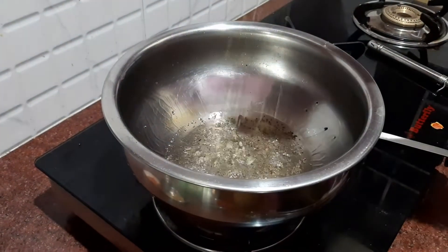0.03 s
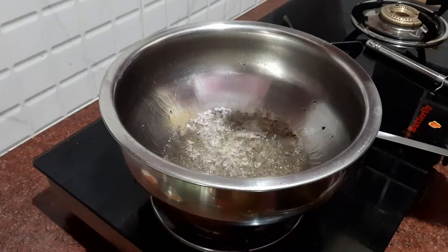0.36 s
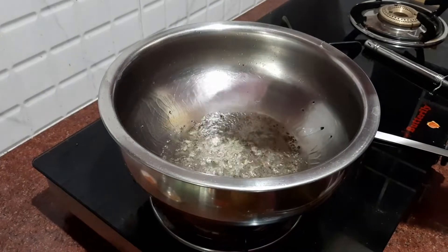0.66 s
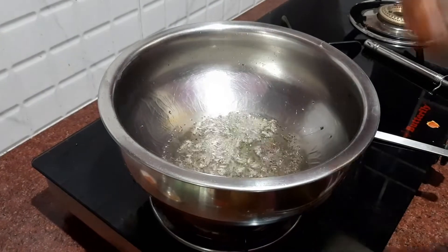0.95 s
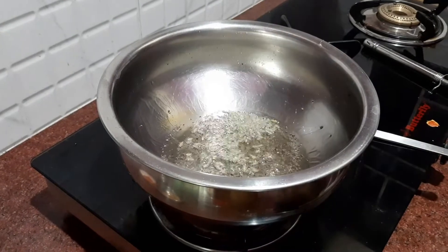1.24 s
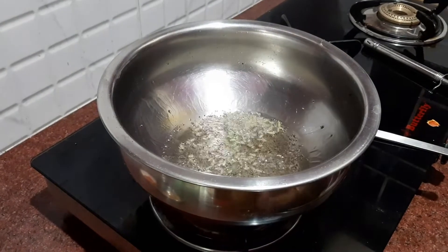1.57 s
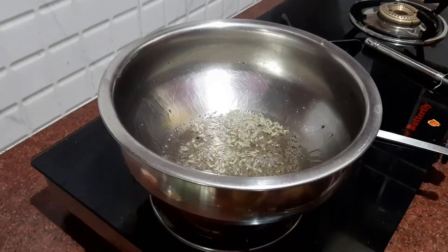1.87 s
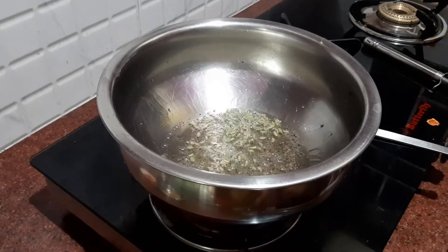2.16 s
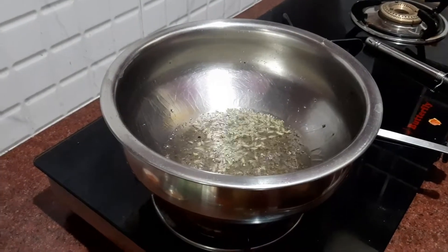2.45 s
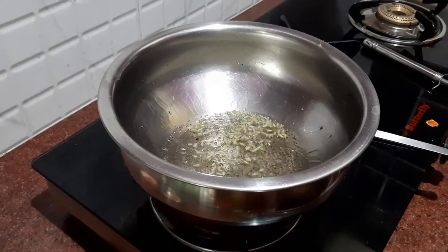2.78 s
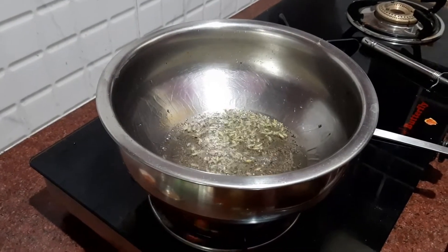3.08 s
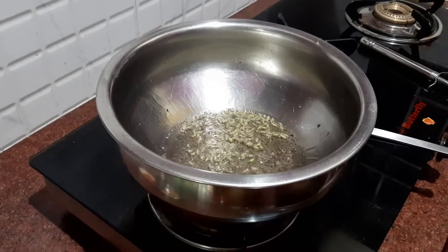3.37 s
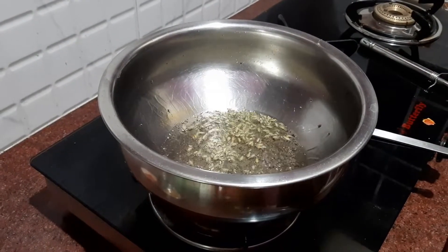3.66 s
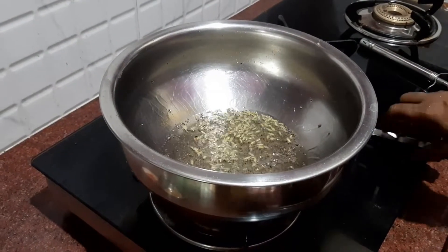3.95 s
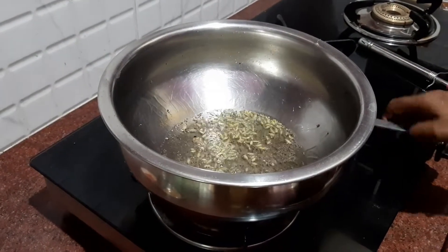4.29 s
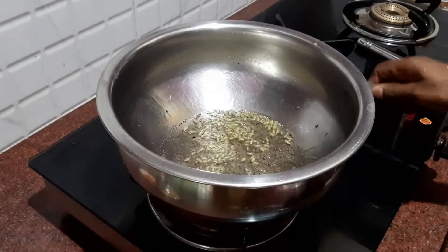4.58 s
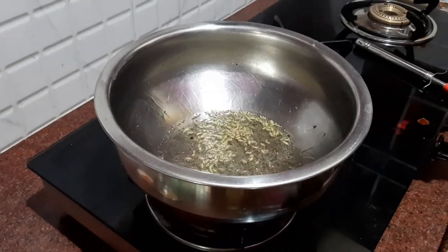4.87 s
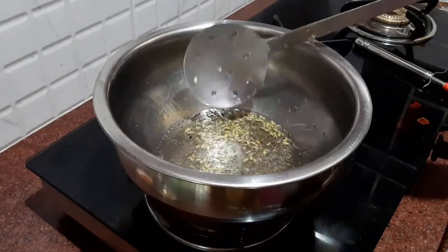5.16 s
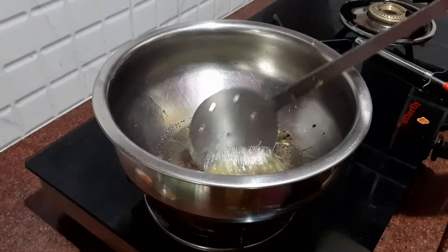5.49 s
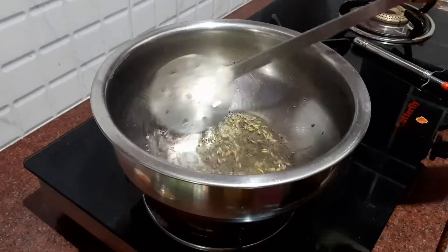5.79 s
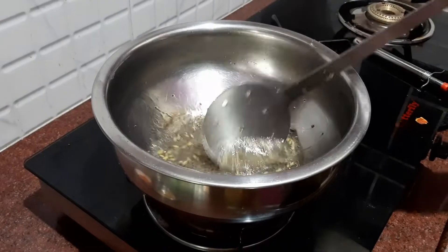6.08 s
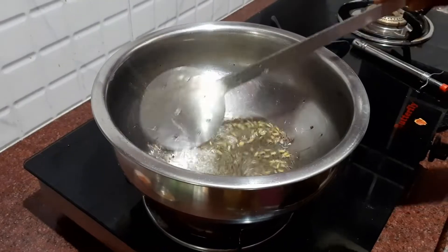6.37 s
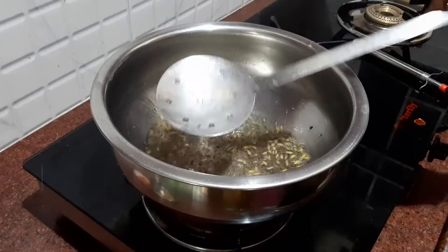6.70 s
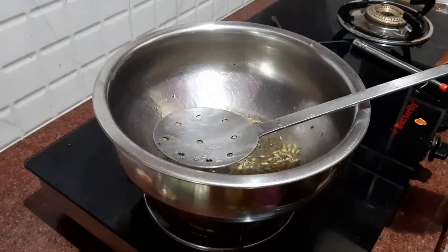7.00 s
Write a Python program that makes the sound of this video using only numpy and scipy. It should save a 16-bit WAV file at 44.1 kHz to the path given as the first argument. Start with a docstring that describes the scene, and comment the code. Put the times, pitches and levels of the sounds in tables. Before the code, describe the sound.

Hot oil crackles around frying seeds in a steel pot until a metal ladle clanks in and stirs with ringing scrapes.

```python
"""Seeds fry in hot oil in a steel pot, over the soft roar of a gas burner in a small tiled kitchen.
From the start, steam leaves them in short squeaks and oil spatters after each; oil films burst in
sharp spits. It all scatters round bowl and room, over a sizzle that thins as the seeds dry.
About five seconds in, a steel ladle knocks the pot, then scrapes and stirs, and the sizzle swells."""
import sys
import numpy as np
from scipy import signal
from scipy.fft import rfft, irfft
from scipy.io import wavfile

SR = 44100
rng = np.random.default_rng(int(sys.argv[2]) if len(sys.argv) > 2 else 0)


def store_wav(level_fs):
    """Save 16-bit WAV to argv[1]."""
    pcm = np.round(np.clip(np.atleast_2d(level_fs), -1, 1) * 32767)
    wavfile.write(sys.argv[1], SR, pcm.T.astype(np.int16))


N = 314874
T = np.arange(N) / SR
HIT_GAIN = np.sqrt(SR / 100)  # brings a sound of unit energy to 0 dB over 10 ms

# The pot's rim, rung by bursts and ladle. Each row: pitch in Hz, level in dB, t60 in seconds.
RIM_MODES = [(1663, -8, .65), (2400, -18, 0.32), (2670, -13, .15), (2722, -5, 0.22), (2790, -13, .12),
             (4290, -13, 0.08), (5518, -10, 0.19)]


def undb(db):
    """Decibels to gain."""
    return 10 ** (np.asarray(db) / 20)


def unit(x):
    """Scale each row to an energy of one."""
    return x / np.sqrt(np.sum(x ** 2, axis=-1, keepdims=True) + 1e-18)


def freqs(size):
    """Frequencies of an FFT of this size, kept above zero."""
    return np.maximum(np.arange(size // 2 + 1) * SR / size, 1)


def colour(points, size):
    """EQ curve in dB: (Hz, dB) points joined on a log-frequency axis."""
    hz, db = np.transpose(points)
    return np.interp(np.log(freqs(size)), np.log(hz), db)


def shape(x, db):
    """Causal filter with this dB response, built from its cepstrum."""
    size = x.shape[-1]
    cepstrum = irfft(db * np.log(10) / 20, size)
    cepstrum[..., 1:size // 2] *= 2
    cepstrum[..., size // 2 + 1:] = 0
    return irfft(rfft(x) * np.exp(rfft(cepstrum)), size)


def add(out, s, sound):
    """Mix a sound (channels x samples) in at time s."""
    i = int(np.clip(s * SR, 0, N - 1))
    out[:, i:i + sound.shape[1]] += sound[:, :N - i]


def convolve(x, response):
    """Pass a sound through a left and a right response."""
    return signal.oaconvolve(x, response, axes=-1)[:, :x.shape[1]]


def grit(size, spike):
    """Noise in which a few strong impulses stand out; spike = 1 is smooth."""
    x = rng.standard_normal(size)
    return np.sign(x) * np.abs(x) ** spike


def ring(modes, size=16384):
    """Decaying modes, each reaching left and right with its own phase."""
    t, out = T[:size], 0
    for hz, db, t60 in modes:
        phase = min(hz / 1000, 2) * rng.standard_normal((2, 1))
        out += undb(db) * unit(np.cos(2 * np.pi * hz * t + phase) * undb(-60 * t / t60))
    return out


def kitchen(bowl_db=7, echo_db=0, room_db=0, t60=0.2, late_db=-21, late_t60=0.23, size=20000):
    """Direct sound, quick reflections in the bowl, a few slaps, a wash off the tiles, a faint tail."""
    # Slaps off the stove wall and other hard surfaces. Each row: rough delay in seconds, level in dB.
    slaps = [(.009, -3.5), (.0155, -7.5), (.023, -9)]
    t = T[:size]
    tiles, late, bowl, *paths = grit((3 + len(slaps), 2, size), spike=1.37)
    bowl_fade = np.exp(-t / 0.0029)
    near = undb(bowl_db) * unit(bowl * bowl_fade)
    near[[0, 1], [0, 3]] += 1  # direct sound, three samples later on the right
    walls = 0
    for (s, db), path in zip(slaps, paths):
        delay = int(SR * s * rng.uniform(0.93, 0.95))
        walls += undb(db + echo_db) * np.roll(unit(path * bowl_fade), delay, axis=1)
    build_up = np.clip(t / 0.008 - 0.5, 0, 1)
    wash = undb(room_db) * unit(tiles * build_up * undb(-60 * t / t60))
    tail = undb(late_db) * unit(late * build_up * undb(-60 * t / late_t60))
    return unit(unit(near) + walls + wash + tail)


def burner(flame_db=1, flutter_db=1.9, flutter_points=60):
    """The gas flame's soft roar flutters a little and keeps the pot humming."""
    # The flame's fader. Each row: time in seconds, level in dB.
    flame_fader = [(0.0, -52), (2.0, -52), (4.2, -50), (5.0, -50), (5.36, -50), (5.52, -55), (7.14, -58)]
    # The roar's tone. Each row: frequency in Hz, gain in dB.
    flame_eq = [(20, -38), (45, -30), (65, -17.5), (90, -5.5), (150, -7.5), (230, -5.5), (350, 0),
                (550, 0.5), (750, 2), (1000, -2), (1600, -6.5), (3000, -11.5), (8000, -22.5), (15000, -20)]
    # The pot's hum. Each row: centre in Hz, width in Hz, level in dB over the flame.
    hum_peaks = [(131, 15, 6), (180.1, 10, 17.5), (270.7, 29, 10), (420, 160, 3.5), (569, 10, 2.5)]
    f = freqs(N)
    hum = sum(undb(db) ** 2 / (1 + (2 * (f - hz) / width) ** 2) for hz, width, db in hum_peaks)
    gain = undb(colour(flame_eq, N)) * np.sqrt(1 + hum)
    roar = unit(irfft(rfft(rng.standard_normal((2, N))) * gain, N)) * np.sqrt(2 * N)
    flutter = np.interp(T, np.linspace(0, T[-1], flutter_points), rng.standard_normal(flutter_points))
    return roar * undb(np.interp(T, *np.transpose(flame_fader)) + flame_db + flutter_db * flutter)


def steel(pitch_hz, octaves, rim_db=2):
    """Ladle and rim ring together, most strongly in the modes near this pitch."""
    # The ladle, damped by the hand. Each row: pitch in Hz, level in dB, t60 in seconds.
    ladle_modes = [(572, 3, 0.15), (701, 8.5, 0.17), (850, -9, 0.049), (1176, -2.5, 0.21),
                   (1325, -1, 0.045), (1530, -4, 0.04), (1826, 1, 0.079), (2140, -1, 0.06),
                   (2331, -5, 0.11), (2595, -3, 0.05), (2860, -6, 0.074), (3300, -4, 0.07),
                   (3500, -6, 0.11)]
    modes = ladle_modes + [(hz, db + rim_db, t60) for hz, db, t60 in RIM_MODES]
    return ring([(hz, db - 20 * np.log10(1 + (np.log2(hz / pitch_hz) / octaves) ** 2), t60)
                 for hz, db, t60 in modes])


def scraping(scrape_db=-1.5, rasp_db=-3, size=16384):
    """The ladle's edge sticks and slips in gritty steps that rasp and keep the steel ringing."""
    # Each row: start in seconds, length in seconds, level in dB, ring centre in Hz, width in octaves.
    strokes = [(5.651, 0.045, -39.5, 900, 0.81), (5.681, 0.019, -42, 2750, .15),
               (5.778, 0.051, -46.5, 705, 0.5), (5.93, 0.087, -49.5, 650, .3),
               (5.947, 0.025, -39, 2620, 0.097), (6.136, 0.037, -38, 2700, .15),
               (6.18, 0.027, -35, 2780, 0.11), (6.232, 0.21, -44, 2720, 0.13),
               (6.313, 0.0575, -36, 1100, .7), (6.38, .04, -32.5, 2590, .12), (6.442, .06, -52, 2720, 0.11),
               (6.589, 0.042, -44, 2720, .12), (7.008, .035, -42, 2800, .12)]
    out = np.zeros((2, N))
    for s, length_s, db, hz, octaves in strokes:
        swell = np.sqrt(np.abs(np.sin(np.pi * np.minimum(T[:size] / length_s, 1))))
        slips = grit((2, size), spike=2.5) * swell
        band_db = -30 * np.log10(1 + (np.log2(freqs(size) / hz) / (2 * octaves)) ** 2)
        rasp = unit(shape(slips, band_db))
        ringing = unit(convolve(slips, steel(hz, octaves)))
        add(out, s, undb(db + scrape_db) * (ringing + undb(rasp_db) * rasp))
    return out * HIT_GAIN


def knocking(pot_db=1.5, ladle_db=-1, ring_octaves=0.51, size=16384):
    """Each knock of the ladle shakes stove and pot, and rings its own share of the steel's modes."""
    # Each row: start in seconds, contact time in seconds, levels in dB of thud, body, clank, tick
    # and ring, ring centre in Hz.
    knocks = [(5.072, 0.00055, -67, -43, -52, -27, -56, 2000),
              (5.080, 0.0015, -68, -28, -38, -26.5, -34, 1310),
              (5.621, 0.003, -74, -62, -44, -52, -46.5, 1520),
              (5.908, 0.0011, -80, -65, -36.5, -34.5, -31.5, 2880),
              (5.957, 0.0016, -72, -57, -39, -32.5, -48, 2300),
              (6.110, 0.0013, -70, -55, -29, -25.5, -40, 1600),
              (6.119, 0.0012, -76, -56, -51, -25, -29, 3400),
              (6.278, 0.002, -58, -53, -50, -31.5, -56, 2700),
              (6.306, 0.002, -70, -56, -43, -44, -35.5, 1000),
              (6.588, 0.0012, -51, -51, -42, -30, -52, 2700)]
    # The pot's low ring. Each row: pitch in Hz, level in dB, t60 in seconds.
    pot_modes = [(137, -10.5, 0.34), (178.8, -4, 1), (238, -12, 0.57), (356, -7, 0.35), (406, 8, 0.73),
                 (497, -1, 0.55), (560, 19.5, 0.39), (593, 3, 0.71), (646, 5, 0.28), (1040, 0, .3)]
    # A knock's four unpitched layers, dark to bright. Each row: frequency in Hz, gain in dB.
    thud_eq = [(20, -9), (60, 0), (130, 7), (300, 5.5), (1000, -42)]
    body_eq = [(25, -56), (60, -41), (130, -11.5), (240, -11), (380, -4), (650, -5), (850, -17.5),
               (1300, -26), (3000, -46), (8000, -51)]
    clank_eq = [(30, -64), (200, -46), (480, 2), (700, 8.5), (1000, -4.5), (1500, 0), (2200, 5.5),
                (3200, -3), (8000, -22)]
    tick_eq = [(50, -37), (500, -32), (1800, -32.5), (2700, -16.5), (4300, -8), (6000, -21.5), (9000, -25),
               (12000, -23.5)]
    hits, resonance = np.zeros((2, 2, N))
    pot = unit(ring(pot_modes))
    click = signal.unit_impulse(size)[None]
    thud, body = (unit(shape(click, colour(eq, size))) for eq in (thud_eq, body_eq))
    for s, contact_s, thud_db, body_db, clank_db, tick_db, ring_db, ring_hz in knocks:
        push = grit((2, size), spike=2.8) * np.exp(-T[:size] / contact_s)
        clank, tick = (unit(shape(push, colour(eq, size))) for eq in (clank_eq, tick_eq))
        ringing = unit(convolve(push, steel(ring_hz, ring_octaves)))
        add(hits, s, undb(body_db) * body + undb(clank_db) * clank + undb(tick_db) * tick)
        add(resonance, s, undb(thud_db) * thud + undb(body_db + pot_db) * pot + undb(ring_db) * ringing)
    room = kitchen(echo_db=-4.5, room_db=-2, t60=0.42)
    return undb(ladle_db) * (convolve(hits, room) + resonance) * HIT_GAIN


def whistles(hz, octaves, t, length_s, sputter_s, count, scatter=0.408, glide=0.401):
    """Steam escapes in quick spurts, each a tiny whistle that glides around the burst's pitch."""
    pitch, bend, strength = rng.uniform(-1.005, 1, (3, count, len(hz), 1))
    delay = np.cumsum(rng.exponential(sputter_s, pitch.shape), axis=0)
    age = np.maximum(t - delay + delay[0], 0) / length_s
    track_hz = hz * 2 ** (octaves * (scatter * pitch + glide * bend * (np.minimum(age, 2) - 1)))
    envelope = undb(0.65 * strength) * age * np.exp(-age ** 2)
    return np.sum(envelope * np.sin(2 * np.pi * np.cumsum(track_hz, axis=-1) / SR), axis=0)


def bursts(rows, whistle_s, sputter_s, jet_s, jet_db, snap_s, spurts, size):
    """Each burst is whistling, a rush of steam around its pitch, and the broad snap of the oil film."""
    # Tone of a squeak through the bowl, and of a bursting film. Each row: frequency in Hz, gain in dB.
    bowl_eq = [(500, 2), (1500, 0), (1900, 0), (2250, 3), (2700, 2.5), (3000, -3.5), (3250, 0), (3900, -3),
               (4400, 2), (5100, -2), (6200, -1), (7400, -2.5), (8600, -8.5), (12000, -9.5)]
    snap_eq = [(200, -21), (600, -38), (1200, -3.5), (3000, -24), (7000, 4), (8500, -7.5), (9500, -4),
               (12000, 0), (14500, -1.5)]
    # Each burst row: start in seconds, squeak in dB, pitch in Hz, width in octaves, snap in dB.
    _, squeak_db, hz, octaves, snap_db = rows.T[:, :, None]
    t = T[:size]
    steam, film = rng.standard_normal((2, len(rows), size))
    detune = np.log2(freqs(size) / hz) / np.maximum(octaves, 0.15)
    band_db = -30 * np.log10(1 + 0.68 * detune ** 2)
    jet = unit(shape(steam * np.sqrt(t) * np.exp(-t / jet_s), band_db))
    tone = unit(whistles(hz, octaves, t, whistle_s, sputter_s, spurts))
    # narrow bursts whistle, wide ones are mostly rushing steam
    squeak = unit(shape(tone + undb(jet_db) * octaves ** 2.2 * jet, colour(bowl_eq, size)))
    snap = unit(shape(film * np.exp(-t / snap_s), colour(snap_eq, size)))
    return (undb(squeak_db) * squeak + undb(snap_db) * snap) * HIT_GAIN


def bubbles(squeak_db, spread_db, snap_db, snap_spread_db, hz, spread_octaves, width, count):
    """Burst rows for the sizzle: a swarm of bubbles, uneven in timing, size and pitch."""
    # The sizzle thins as the seeds dry and swells when they are stirred.
    # Each row: time in seconds, squeak level in dB, snap level in dB.
    sizzle_faders = [(0.0, -42, -51.5), (0.2, -48, -53), (0.36, -54, -70), (0.57, -44.5, -63),
                     (0.7, -40.5, -55), (1.09, -43, -56), (1.18, -51, -61), (1.3, -42, -53),
                     (2.36, -47, -54.5), (2.7, -40, -58), (3.52, -50.5, -57), (3.76, -49, -73),
                     (4.06, -42, -65), (4.47, -62.5, -64), (5.09, -43, -57), (5.27, -46.5, -48),
                     (5.65, -47, -60), (5.83, -50.5, -56), (6.1, -42, -50), (6.52, -44.5, -49.5),
                     (6.7, -45, -47.5), (6.85, -49, -59.5), (7.0, -49, -53), (7.14, -51, -50)]
    late, *chance = rng.standard_normal((count, 4)).T
    big, sharp, pitch = np.clip(chance, -2, 2)
    s = (np.arange(count) + late / 2) % count * N / SR / count
    times, *levels = np.transpose(sizzle_faders)
    squeak, snap = (np.interp(s, times, db) for db in levels)
    squeak += squeak_db + spread_db * big
    snap += snap_db + snap_spread_db * sharp
    return np.c_[s, squeak, hz * 2 ** (spread_octaves * pitch), np.full(count, width), snap]


def froth(stir_s=(6.08, 6.77), bubble_db=-48, spread_db=5, snap_db=-11,
          hz=4200, spread_octaves=0.39, width=0.57, count=130):
    """Burst rows for the crackling froth where the ladle pushes wet seeds over hot steel."""
    when, big, pitch = rng.uniform(-1, 1, (count, 3)).T
    s = np.interp(when, (-1, 1), stir_s)
    db = bubble_db + spread_db * big
    return np.c_[s, db, hz * 2 ** (spread_octaves * pitch), np.full(count, width), db + snap_db]


def spits(s, db, steam_db=-9.5, hz=4850, octaves=1):
    """Burst rows led by the snap of an oil film, with a little high steam."""
    return np.c_[s, db + steam_db, np.full(len(s), hz), np.full(len(s), octaves), db]


def squeaks(snap_db=-18, mean_wait_s=0.015, spatter_db=-14, spread_db=2):
    """Burst rows led by steam leaving a seed; a moment after each, the oil spatters."""
    # The loud squeaks. Each row: start in seconds, level in dB, pitch in Hz, width in octaves.
    vents = [(.008, -33, 4420, 0.64), (0.054, -31.5, 4270, 1.33), (0.126, -29, 4300, 1.06),
             (.135, -34, 2440, .3), (.231, -29, 4450, 1.3), (.262, -30.5, 4500, 0.96),
             (0.314, -30.5, 4300, 0.79), (.383, -25, 4570, 0.7), (.393, -28, 4560, .9),
             (0.424, -33, 4600, 0.88), (0.479, -25.5, 4840, 1.1), (0.589, -29, 3930, 0.69),
             (.616, -26, 3860, 0.85), (0.694, -28.5, 4930, 0.58), (0.722, -39, 3800, 0.85),
             (.746, -29, 4030, 1.2), (0.784, -30, 4320, 2), (0.845, -34, 4200, 0.92),
             (.87, -34.5, 4740, 0.71), (.897, -25.5, 3800, 0.76), (0.96, -35.5, 4300, 1.4),
             (1.047, -31.5, 4300, 1.9), (1.12, -36.5, 4230, 0.91), (1.138, -31, 4120, 0.94),
             (1.191, -29, 4680, 0.57), (1.223, -27.5, 4360, 0.78), (1.274, -28.5, 4180, 0.69),
             (1.399, -31, 4900, 0.73), (1.409, -43, 4250, 0.54), (1.452, -27, 4240, 0.52),
             (1.467, -28.5, 4350, 0.52), (1.536, -36.5, 2720, 0.41), (1.546, -26.5, 4100, 0.78),
             (1.581, -29.5, 4400, 0.8), (1.617, -28, 4720, 0.89), (1.636, -26.5, 3860, 0.93),
             (1.698, -29.5, 3800, 2.3), (1.804, -29.5, 4620, 0.96), (1.861, -36, 4500, 1.3),
             (1.885, -27.5, 4380, 0.65), (1.948, -27, 4800, 1.06), (1.973, -24.5, 4180, 0.7),
             (2.094, -30.5, 4280, 0.73), (2.151, -26.5, 4600, 1.1), (2.169, -30.5, 4450, 0.58),
             (2.217, -30.5, 4900, 0.77), (2.268, -26.5, 4030, .55), (2.295, -24.5, 3860, 0.68),
             (2.333, -30.5, 4150, 0.85), (2.422, -30.5, 4630, 1.2), (2.478, -31, 4560, 0.69),
             (2.503, -33.5, 4130, 1), (2.529, -29, 4390, 0.81), (2.591, -28.5, 4500, 0.66),
             (2.635, -30, 4250, 1.2), (2.678, -26, 4070, 0.79), (2.643, -35, 2100, 0.56),
             (2.711, -38, 810, 0.24), (2.732, -28.5, 3670, 0.95), (2.796, -33, 4300, 1.1),
             (2.861, -34, 3680, 1.7), (2.892, -27.5, 4200, 0.46), (2.919, -32, 4070, 0.4),
             (2.955, -35, 4400, 0.29), (2.972, -33.5, 4830, 0.63), (3.028, -30.5, 4320, 0.67),
             (3.046, -28, 3860, 0.66), (3.057, -32.5, 2570, 0.5), (3.104, -32.5, 4290, 0.31),
             (3.11, -38.5, 2010, 0.33), (3.142, -30.5, 4850, 0.44), (3.196, -30, 4930, 0.4),
             (3.329, -26, 4600, 1.4), (3.396, -30.5, 3500, 0.82), (3.423, -26.5, 4200, 0.55),
             (3.513, -28.5, 4270, 1.2), (3.523, -35, 3160, 0.68), (3.626, -26, 4180, 0.78),
             (3.67, -32, 3180, 0.78), (3.673, -37, 2030, 0.37), (3.746, -30, 4380, 0.77),
             (3.771, -34.5, 4400, 0.88), (3.846, -25, 4440, 0.33), (3.963, -27, 4300, 1.1),
             (4.012, -28, 5000, 0.39), (4.034, -28, 4130, 0.68), (4.134, -29.5, 5340, 0.26),
             (4.212, -27.5, 5260, 0.53), (4.279, -29.5, 4380, 0.53), (4.385, -29.5, 4320, 0.58),
             (4.42, -33.5, 4660, .75), (4.44, -28, 4370, 0.64), (4.449, -32.5, 2320, 0.26),
             (4.467, -32, 3760, 0.51), (4.613, -29.5, 4260, 0.63), (4.62, -26, 4200, 0.95),
             (4.68, -32.5, 5030, 0.95), (4.729, -23.5, 5430, 0.96), (4.809, -25.5, 4060, 0.67),
             (4.929, -29, 4400, 0.79), (4.971, -37, 4720, 0.54), (5.014, -41, 4350, 0.85),
             (5.205, -28.5, 4100, 1.25), (5.212, -35.5, 2370, 0.27), (5.38, -31, 4780, 0.79),
             (5.384, -25, 3900, 0.4), (5.483, -35.5, 3590, 0.23), (5.568, -39, 4820, 0.39),
             (5.684, -35, 3750, 0.8), (5.714, -40, 4600, 0.48), (5.802, -34, 3820, 0.49),
             (6.023, -33.5, 3560, 0.45), (6.072, -31.5, 4700, 0.63), (6.29, -33.5, 4300, 0.39),
             (6.478, -32.5, 3800, 0.64), (6.511, -34.5, 4200, 1.4), (6.616, -29.5, 4720, 0.72),
             (6.648, -32, 4410, 0.65), (6.733, -31, 4320, 0.48), (6.882, -34.5, 4340, 0.44),
             (6.931, -34, 4750, 0.54), (6.971, -33, 4730, 0.51), (7.013, -40, 3250, 0.2),
             (7.081, -37.5, 4120, 0.49)]
    rows = np.array(vents, float)
    s, db = rows.T[:2]
    wait, big = rng.uniform(-1, 1, (len(rows), 2)).T
    spatter = spits(s + mean_wait_s * (1 + wait), db + spatter_db + spread_db * big)
    return np.vstack([np.c_[rows, db + snap_db], spatter])


def spots(events, bowl_db, count, rim_db=-15.5):
    """Deal (start, sound) events to spots in the oil; each has its own echoes and rings the rim."""
    out = 0
    for spot in range(count):
        oil = np.zeros((1, N))
        for s, sound in events[spot::count]:
            add(oil, s, sound[None])
        room = kitchen(bowl_db)
        rim = undb(rim_db + rng.uniform(-4, 3)) * ring(RIM_MODES, size=20000)
        out += convolve(oil, room + rim)
    return out


def frying(seed_db=-1, spit_db=-2):
    """Squeaks and bubbles sound from deep in the bowl; spits burst on top and arrive more directly."""
    # The loud spits of bursting oil films, along with a sharp knock on the pot at 5.151 s that is played the
    # same way. Each row: start in seconds, level in dB.
    spit_cues = [(0.156, -34), (.383, -44), (.488, -26.5), (0.695, -36), (1.192, -45), (1.583, -36),
                 (1.991, -27), (2.179, -33.5), (2.25, -35), (2.28, -31.5), (2.32, -36), (2.42, -37),
                 (2.429, -27.5), (2.643, -28.5), (2.736, -29.5), (3.073, -28), (3.128, -35.5), (3.236, -27),
                 (3.358, -27), (3.558, -32.5), (3.626, -34), (3.846, -40), (3.996, -34), (4.15, -33),
                 (5.013, -41), (5.071, -25.5), (5.151, -29), (5.286, -25.5), (5.292, -30.5), (5.384, -27),
                 (5.569, -33), (5.853, -32), (6.059, -27.5), (6.549, -31.5), (6.586, -27.5), (7.11, -44)]
    seeds, films = squeaks(), spits(*np.transpose(spit_cues))
    lesser = bubbles(squeak_db=6.5, spread_db=3, snap_db=7, snap_spread_db=1,
                     hz=4638, spread_octaves=0.32, width=0.686, count=190)
    plinks = bubbles(squeak_db=-7.5, spread_db=4, snap_db=-16, snap_spread_db=5,
                     hz=2560, spread_octaves=0.09, width=0.33, count=90)
    tiny = bubbles(squeak_db=-8.5, spread_db=6, snap_db=-2, snap_spread_db=3.5,
                   hz=4560, spread_octaves=0.4, width=0.66, count=1100)
    # loud seeds vent at once; a spit is one sharp snap
    loud = bursts(seeds, whistle_s=0.0006, sputter_s=0.0006, jet_s=0.0009, jet_db=11,
                  snap_s=0.0002, spurts=5, size=640)
    sharp = bursts(films, whistle_s=0.0005, sputter_s=0.0005, jet_s=0.0008, jet_db=10,
                   snap_s=0.00028, spurts=2, size=512)
    slow = np.vstack([lesser, plinks])  # lesser seeds sputter for a moment
    sputter = bursts(slow, whistle_s=0.00085, sputter_s=0.00207, jet_s=0.0052, jet_db=9.5,
                     snap_s=0.00054, spurts=3, size=768)
    fine = np.vstack([tiny, froth()])  # the smallest bubbles give one short whistle
    soft = bursts(fine, whistle_s=0.00067, sputter_s=0.001, jet_s=0.0022, jet_db=9.5,
                  snap_s=0.00022, spurts=1, size=384)
    deep = [*zip(seeds[:, 0], undb(seed_db) * loud), *zip(slow[:, 0], sputter), *zip(fine[:, 0], soft)]
    on_top = [*zip(films[:, 0], undb(spit_db) * sharp)]
    return spots(deep, bowl_db=7, count=13) + spots(on_top, bowl_db=1.5, count=4)


def scene():
    """Oil, ladle and flame together."""
    return frying() + knocking() + scraping() + burner()


def record(dry, top_hz=14300):
    """Two close microphones share the low notes; a steep low-pass cuts the top."""
    # Stereo width. Each row: frequency in Hz, side gain in dB.
    side_eq = [(25, -3), (70, -13), (150, -13.5), (300, -12.5), (550, -8.5), (1000, -0.5)]
    mid, side = (dry[0] + dry[1]) / 2, (dry[0] - dry[1]) / 2
    side = irfft(rfft(side) * undb(colour(side_eq, N)), N)
    low_pass = signal.ellip(10, 0.1, 50, top_hz, fs=SR, output="sos")
    return signal.sosfiltfilt(low_pass, np.array([mid + side, mid - side]))


dry = scene()
out = record(dry)
store_wav(out)
```